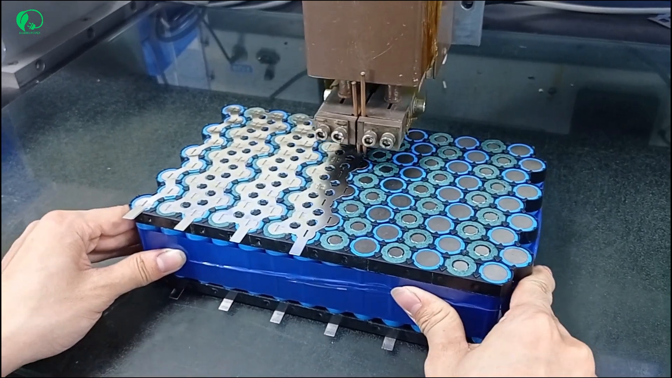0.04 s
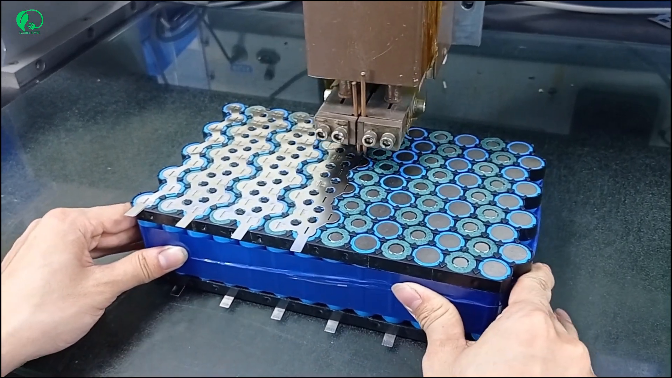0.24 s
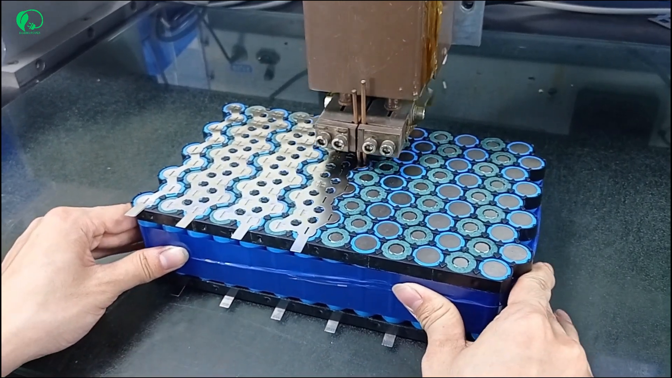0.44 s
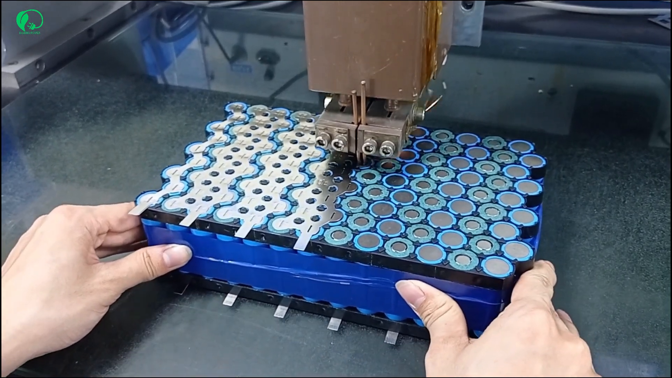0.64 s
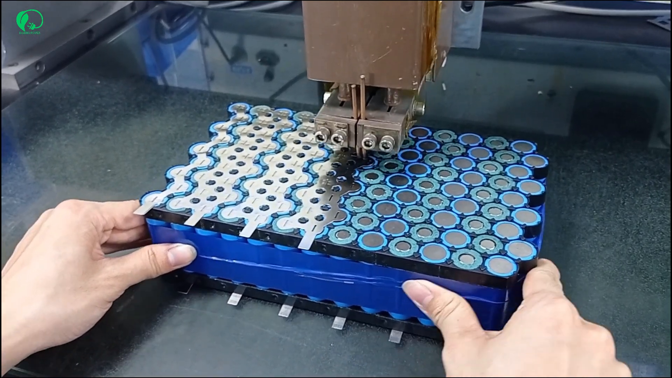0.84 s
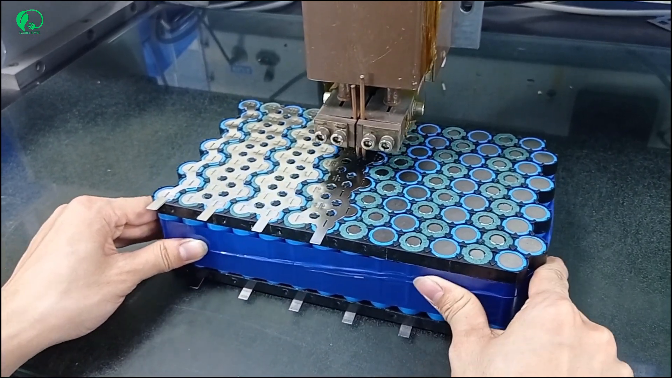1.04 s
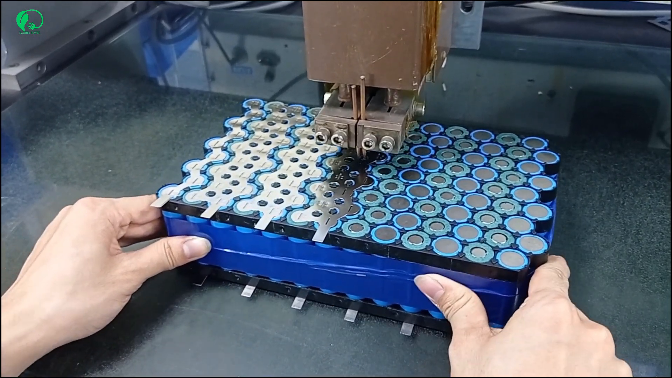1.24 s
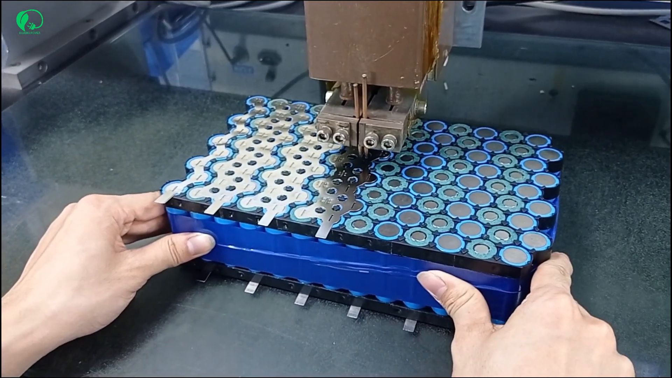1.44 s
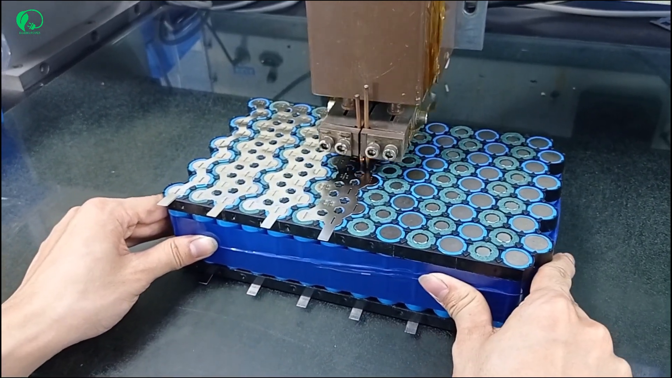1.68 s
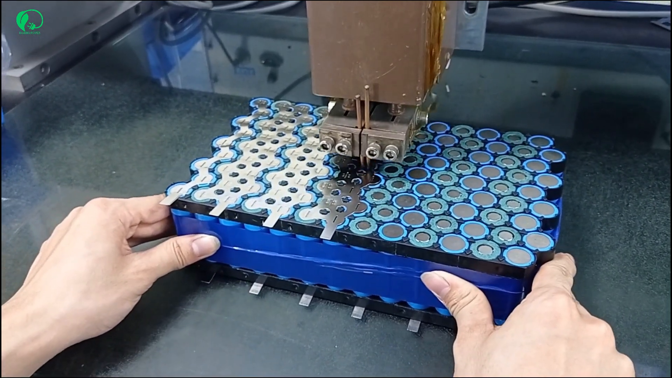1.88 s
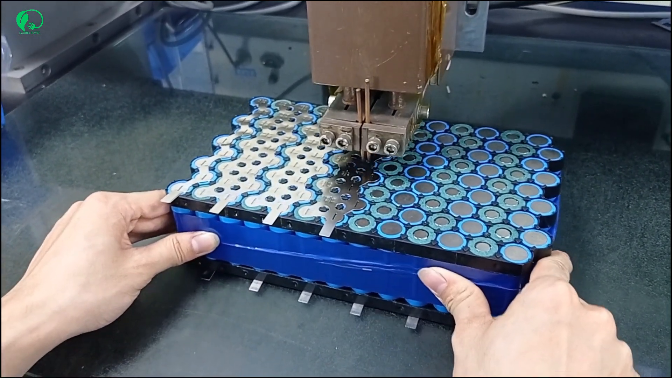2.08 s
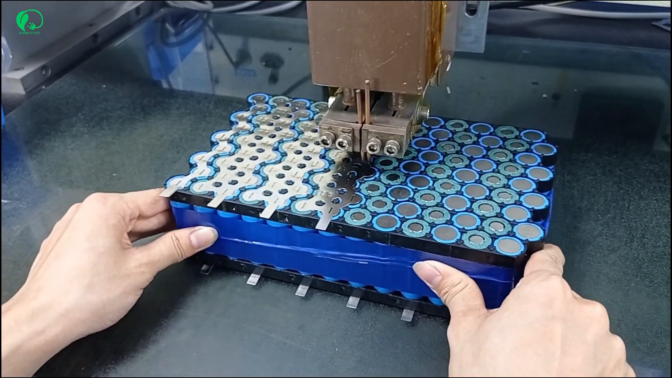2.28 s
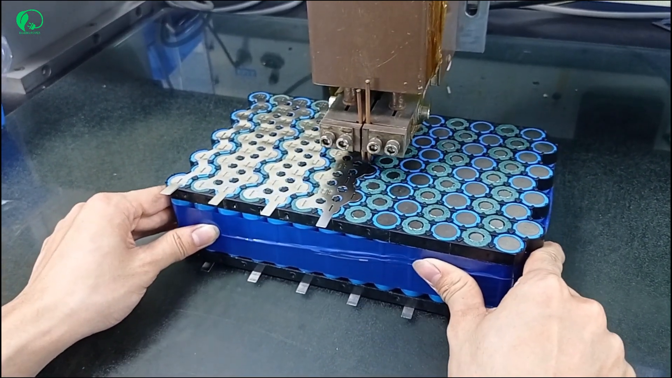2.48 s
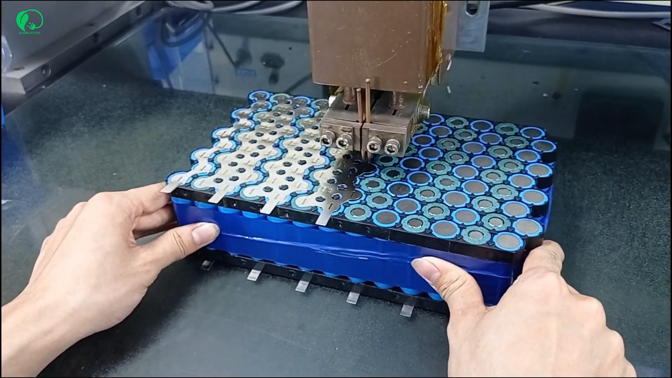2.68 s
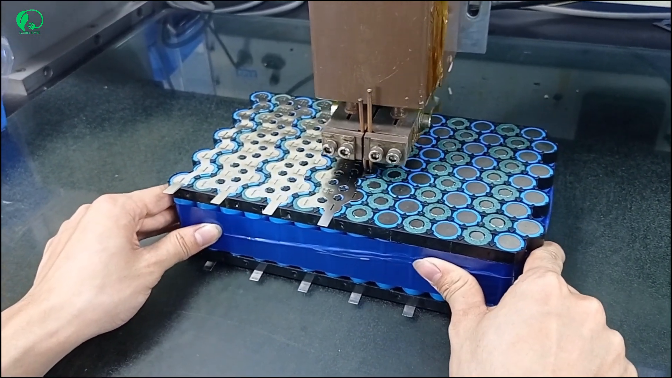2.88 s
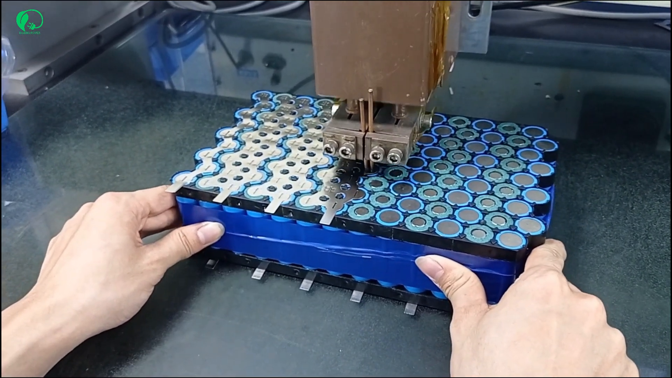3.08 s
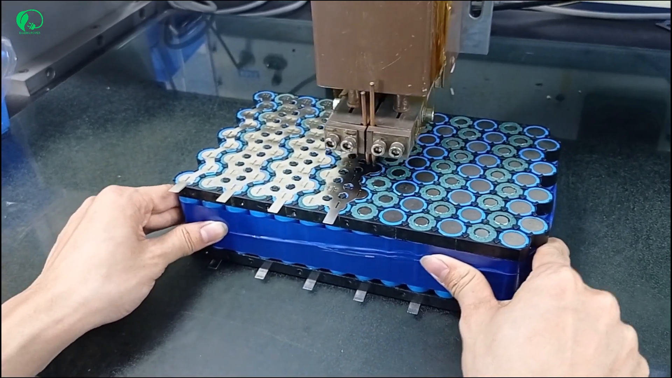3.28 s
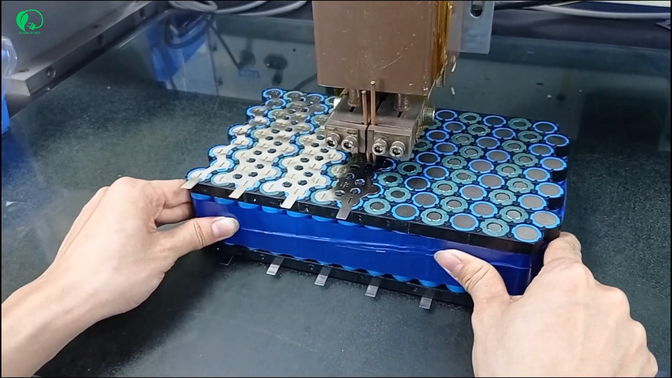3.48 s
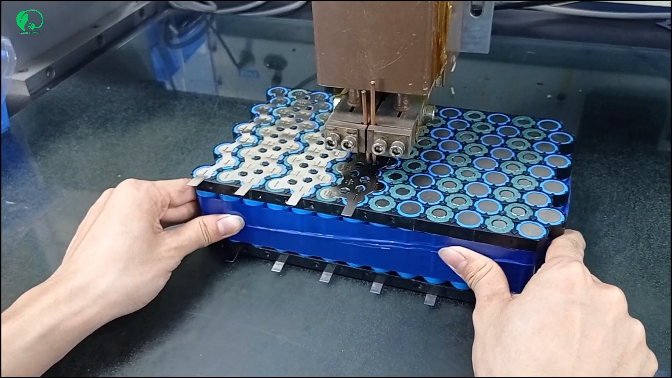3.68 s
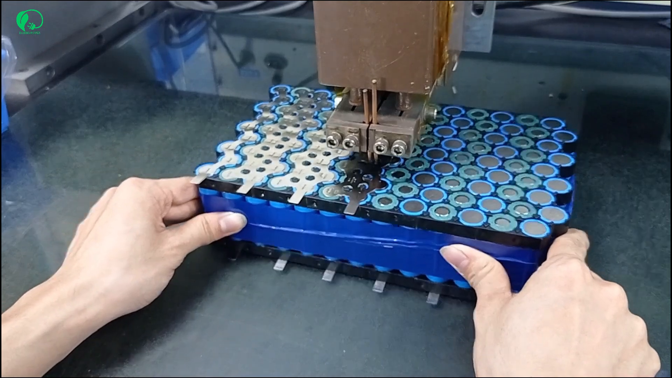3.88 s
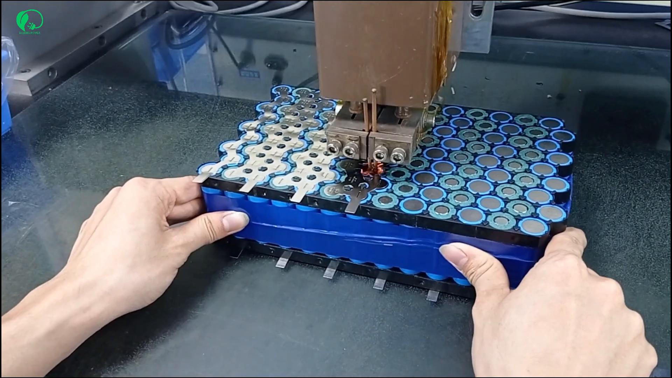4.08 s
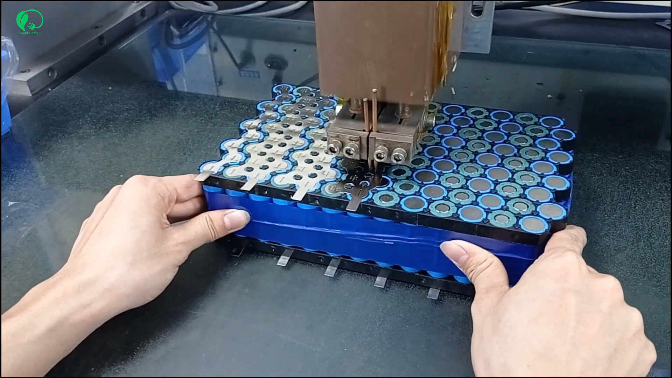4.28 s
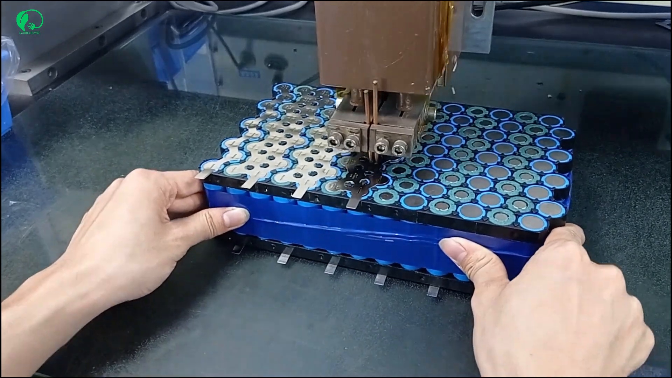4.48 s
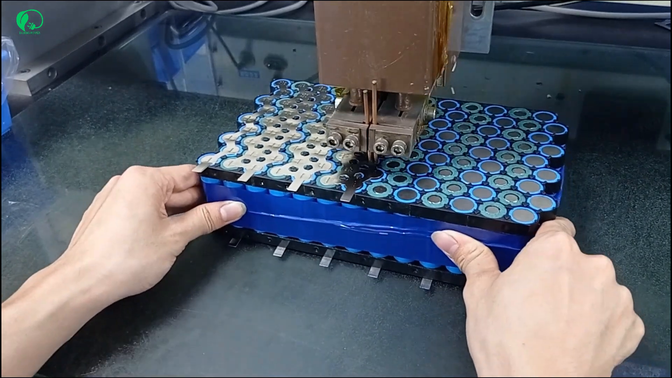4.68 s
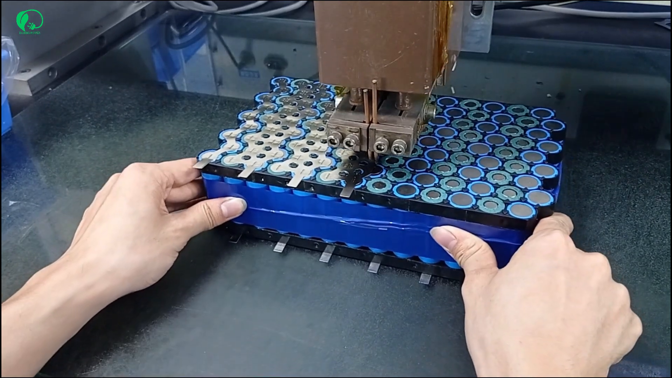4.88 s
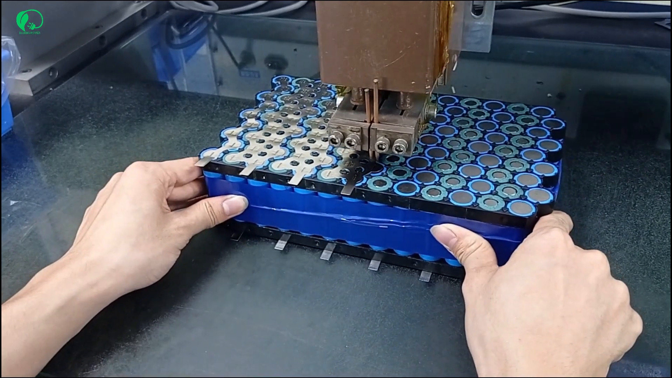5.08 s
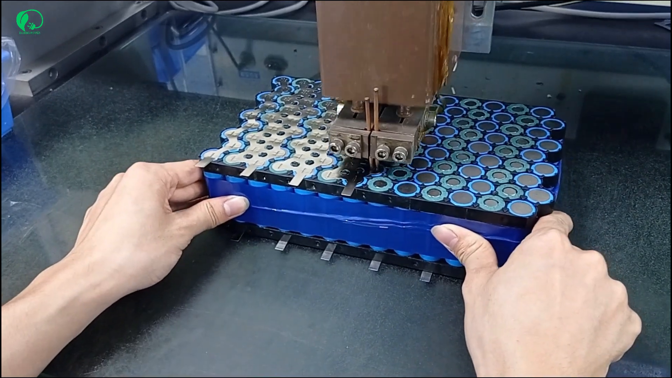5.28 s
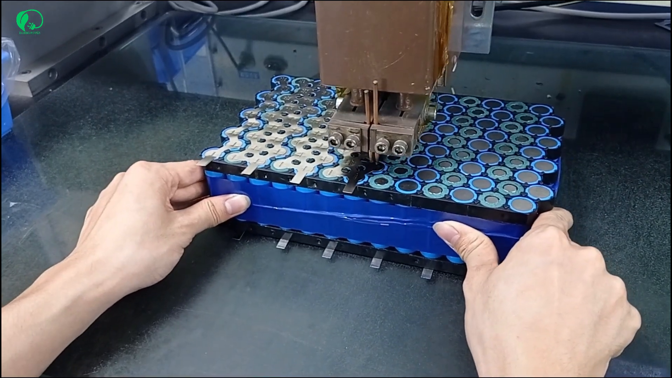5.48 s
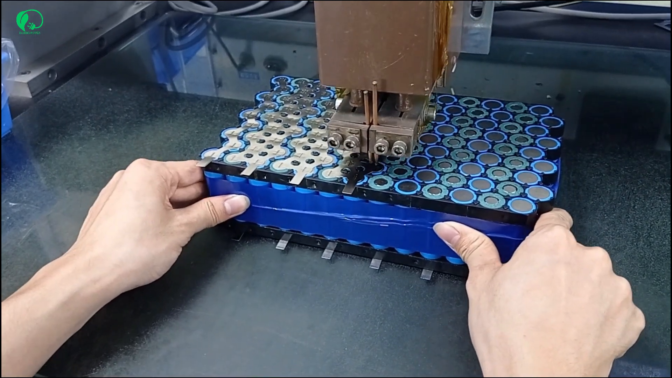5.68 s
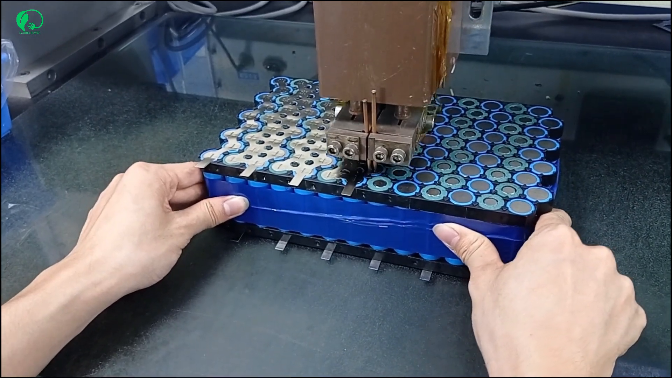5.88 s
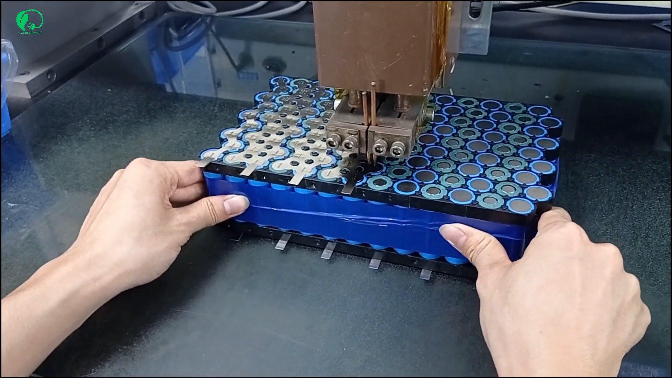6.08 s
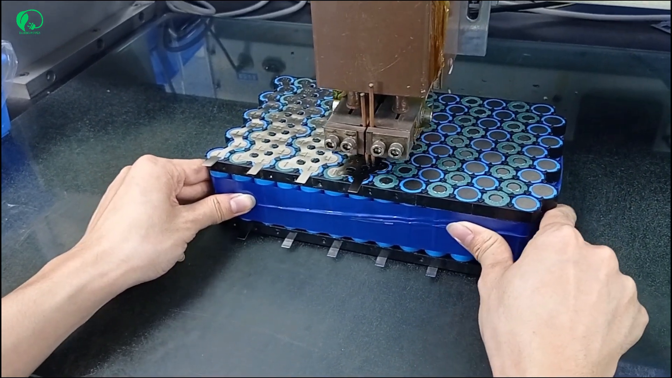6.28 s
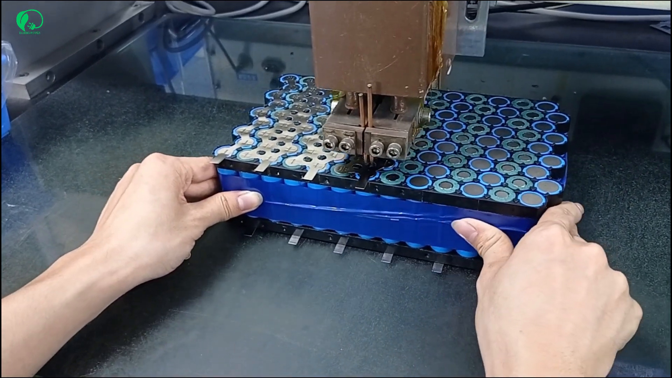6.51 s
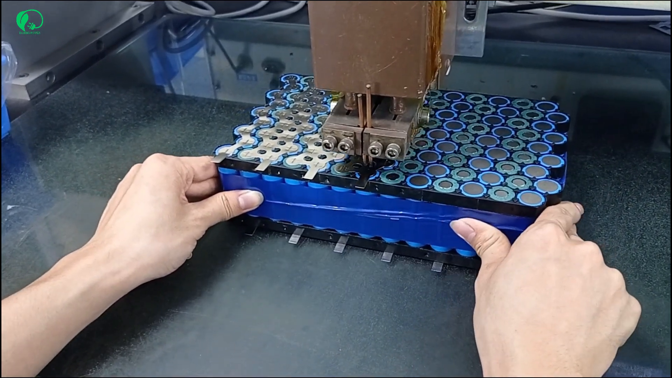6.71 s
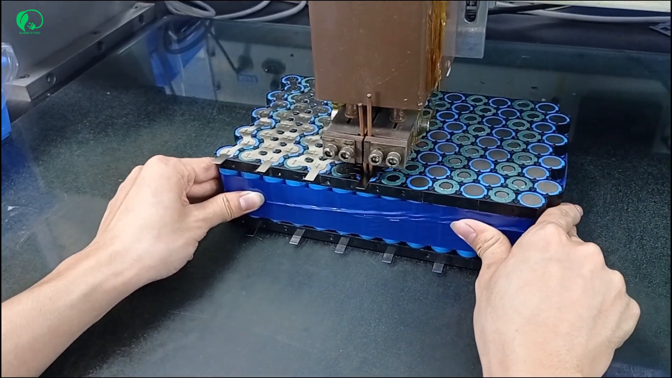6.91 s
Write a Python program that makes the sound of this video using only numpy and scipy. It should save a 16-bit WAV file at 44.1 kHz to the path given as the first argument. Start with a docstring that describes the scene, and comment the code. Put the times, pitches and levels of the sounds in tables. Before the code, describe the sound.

A steady, mid-toned drone and whirr of factory machines runs throughout, with a faint hall echo. Close to the microphone, a pneumatic spot welder works on a battery pack. Each stroke starts with a puff of air, then a metallic clack and jangle with low thumps, a tiny squeak, and about 0.15 seconds after landing a sharp, bright weld snap, followed by a rattling rebound. Pairs snap at about 0.5 and 0.8, 1.8 and 2.0, 3.0 and 3.3, then 4.2 and 4.5 seconds. Singles follow at 5.4, 6.1 and 7.1. Strokes after a longer rest open with a clicking spit of air. Small vents hiss around 1.5, 2.4, 2.8 and 6.55. Very thin, high metal squeals flutter near 2.2, 4.7 and 5.5 as the pack shifts. Faint distant knocks come around 2.4 and 3.8.

```python
"""Machines hum in a factory hall while a nearby pneumatic welder makes four pairs of spot welds, then three singles.
In each stroke the valve puffs, the head lands, squeaks and presses, the weld snaps and the head rebounds.
Air vents between some strokes; thin squeals, as the battery pack is shifted, follow the second and fourth
pairs and the first single. Filtered noise makes the air and contacts, sines the resonances and squeals."""
import sys
import numpy as np
from scipy import signal
from scipy.fft import rfft, irfft, next_fast_len
from scipy.io import wavfile
from scipy.ndimage import map_coordinates

SR = 44100
rng = np.random.default_rng(int(sys.argv[2]) if len(sys.argv) > 2 else 0)


def wrap_up_sound(samples):
    """Save the sound to the file named by the first command line argument, as 16-bit audio."""
    columns = np.atleast_2d(samples).T
    # keep every value between -1 and 1, then stretch to whole-number steps
    tamed = np.clip(columns, -1, 1)
    steps = np.round(tamed * 32767).astype(np.int16)
    wavfile.write(sys.argv[1], SR, steps)


N = 306406  # length in samples

# All levels in the tables are relative; each source adds its own gain.
# Noise spectra of the hall's machines, escaping air and the frame: [f/Hz, level/dB per Hz]
HALL_SPECTRUM = [(30, -10), (97, -2), (161, -1), (373, -6), (600, -9), (1000, -14), (1500, -16.5),
                 (1950, -15.5), (2410, -8.5), (3000, -16.5), (3820, -26.5), (6900, -31.5), (10000, -46.5),
                 (14000, -85)]
AIR_SPECTRUM = [(300, 12.5), (1500, -5), (2100, 15.5), (2800, 6.5), (3700, -2), (5500, 2), (7400, 6.5),
                (9000, -3), (10500, -5.5), (13000, -21), (15200, -2.5), (17000, -42)]
FRAME_SPECTRUM = [(45, -45), (70, -43), (95, 4.5), (150, 4), (220, -2), (300, -13.5), (600, -58)]
# Noise spectra of the head's contact, loose steel and the weld: [f/Hz, level/dB per Hz]
CLACK_SPECTRUM = [(60, -39), (100, -0.5), (230, 1.5), (300, -5), (600, -4.5), (950, -3.5), (1350, -11.5),
                  (1900, -20), (3000, -31), (8000, -52)]
JANGLE_SPECTRUM = [(700, -21), (1500, -9), (1950, -7), (2350, 2.5), (2950, -3), (3700, -17), (5200, -20.5),
                   (7000, -18), (10000, -32.5), (13000, -44), (15300, -28), (17000, -54)]
CRACK_SPECTRUM = [(120, -30), (200, -5), (370, -11.5), (870, -1), (1400, -4), (1700, -3), (1950, -14),
                  (2250, -2), (2900, -2.5), (3700, -13), (5400, -12), (7600, -3.5), (12800, -28),
                  (15000, -12), (17000, -39)]
# Knocks further off in the hall: [t/s, level/dB]
FAR_KNOCKS = [(2.403, -42), (2.495, -31), (3.817, -36.5)]
# Reverberation time of the hall: [f/Hz, t60/s]
ROOM_DECAY = [(100, 2.12), (1000, 1.33), (3000, 0.9), (7000, 0.99), (11000, 0.64), (15000, 0.55)]
# Metal squeals as the pack shifts, one curve each: [t/s, f/Hz, level/dB]
SQUEAL_CURVES = [
    [(2.17, 11400, -67), (2.198, 11500, -47), (2.25, 11300, -46), (2.3, 11300, -58), (2.31, 11300, -53)],
    [(4.61, 11500, -63), (4.62, 11200, -56), (4.654, 11900, -52), (4.68, 11760, -52), (4.692, 11600, -48),
     (4.802, 11560, -50), (4.83, 11800, -58)],
    [(5.48, 12200, -60), (5.504, 12400, -53), (5.532, 12300, -52), (5.56, 11900, -72)],
]
# Small vents of air between strokes: [t/s, level/dB, hold/s, t60/s]
AIR_VENTS = [(1.4664, -37, 0.003, 0.04), (2.381, -26.5, 0.017, 0.42), (2.7554, -42, 0.003, 0.05),
             (6.554, -30, 0.015, 0.43)]
# Partials of the squeaking slide: [f/Hz, level/dB]
SLIDE_PARTIALS = [(4150, -7.5), (7250, -7), (7800, -5.5), (12200, -25)]
# Modes of the electrode holder: [f/Hz, width/Hz, level/dB]
HOLDER_MODES = [(849, 25, -8), (1656, 54, 0), (2244, 52, 1), (2655, 71, 3), (2900, 28, -2), (3526, 23, -5),
                (3974, 27, -7.5), (4837, 120, -4.5), (4870, 28, -22), (5100, 63, -17), (6000, 40, -46),
                (6640, 97, 2.5), (6940, 120, -12), (7340, 54, -33), (7870, 56, -3), (8570, 49, -11)]
# Strokes: [landing t/s, snap t/s, valve level/dB, head level/dB, snap level/dB]
WELD_STROKES = [(0.399, 0.542, -2, 0.5, -9), (0.645, 0.7944, -3.5, -2, -10.5),
                (1.638, 1.7851, -0.5, 2, -9.5), (1.896, 2.0419, -3.5, -3, -8.5),
                (2.893, 3.0434, -0.5, 0.5, -7), (3.12, 3.268, -8, -5.5, -9.5),
                (4.066, 4.224, -0.5, 0.5, -9), (4.347, 4.4898, -3, -1, -6.5), (5.3, 5.444, 1, 1, -8),
                (5.921, 6.0617, -1.5, 0, -8.5), (6.966, 7.11, 2.5, 0, -8.5)]
# Blows as the head lands and presses home: [t after landing/s, clack level/dB, steel jangle level/dB,
# frame thump level/dB, thump f/Hz, bench boom level/dB]
PRESS_BLOWS = [(0, -20, -24, -33, 150, -31), (0.0625, -23.5, -21.5, -26, 172, -32),
               (0.098, -25.5, -27, -33, 200, -46)]
# Blows as the head rebounds and settles: [t after snap/s], then the same columns
REBOUND_BLOWS = [(0.034, -22.5, -24.5, -25.5, 185, -41), (0.066, -31, -34, -28.5, 215.6, -34)]

REST_S = 0.3  # the valve's click is heard only after a longer rest
CLICK_LEAD_S, PUFF_LEAD_S, HISS_LEAD_S = 0.077, 0.065, 0.055  # valve opens, piston jolts, air escapes: before landing
CLICK_DB, HISS_DB, JOLT_DB = -23, -31, -26  # relative levels
CLICK_T60_S = 0.26
SQUEAK_AFTER_S, SQUEAK_S, SQUEAK_DB = 0.044, 0.033, -30  # delay after landing, duration, gain
BLOW_SCATTER_DB, PITCH_SCATTER = 1.5, 0.071  # standard deviations from blow to blow; pitch in log units
TOP_HZ = 16100  # upper band limit


def amp(db):
    """Decibel law: twenty decibels are a tenfold amplitude."""
    return 10 ** (np.asarray(db) / 20)


def unit(x):
    """Normalisation: scale a signal to rms 1."""
    return x / np.sqrt(np.mean(x ** 2) + 1e-20)


def along(points, hz):
    """Logarithmic frequency axis: interpolate [f/Hz, value] points."""
    f, value = np.transpose(points)
    return np.interp(np.log(hz + 1), np.log(f + 1), value)


def filtered(x, response):
    """Linear filtering: multiply the spectrum by a response of frequency."""
    size = next_fast_len(len(x) + 8192)  # zero padding
    spectrum = rfft(x, size) * response(np.fft.rfftfreq(size, 1 / SR))
    return irfft(spectrum, size)[:len(x)]


def noise(spectrum, size):
    """Spectral shaping: white noise coloured by a table, at rms 1."""
    return unit(filtered(rng.standard_normal(size), lambda hz: amp(along(spectrum, hz))))


def band(centre_hz, width_hz, size):
    """Resonance: noise passed through one bell-shaped peak, at rms 1."""
    def peak(hz):
        return 1 / (1 + (2 * (hz - centre_hz) / width_hz) ** 2)
    return unit(filtered(rng.standard_normal(size), peak))


def wobble(rate, size):
    """Slow random modulation: a smooth curve through rate random knots a second."""
    knots = rng.standard_normal(int(size * rate / SR) + 4)
    return map_coordinates(knots, [np.arange(size) * rate / SR])


def tone(hz):
    """Phase is the integral of frequency: a sine on a pitch curve, from a random phase."""
    return np.sin(2 * np.pi * (np.cumsum(hz) / SR + rng.random()))


def burst(t, rise, hold, t60):
    """Excitation and damping: an envelope that rises, holds and falls exponentially (times in s)."""
    return (1 - np.exp(-t / rise)) * amp(-60 * np.maximum(t - hold, 0) / t60)


def add(track, s, sound):
    """Superposition: add a sound to the track at t = s seconds."""
    part = track[max(round(s * SR), 0):][:len(sound)]
    part += sound[:len(part)]


def hall():
    """Broadband and resonant noise: machines drone and whirr, with damped knocks further off."""
    drone = noise(HALL_SPECTRUM, N) * amp(0.16 * wobble(7, N))
    whirr = band(centre_hz=2390, width_hz=670, size=N)
    out = amp(-43.0) * drone + amp(-51) * whirr
    t = np.arange(SR // 2) / SR
    for s, db in FAR_KNOCKS:
        knock = band(centre_hz=694, width_hz=1100, size=len(t)) * burst(t, rise=0.0019, hold=0.012, t60=0.71)
        add(out, s, amp(db - 6.5) * knock)
    return out


def echo(x):
    """Reverberation: convolution with a noise tail in which each frequency dies at its own rate."""
    hz, t, cells = signal.stft(rng.standard_normal(SR), SR, nperseg=256)
    decay = amp(-60 * t / along(ROOM_DECAY, hz)[:, None])
    tail = signal.istft(cells * decay, SR, nperseg=256)[1]
    tail = np.pad(tail / np.linalg.norm(tail), (round(.02 * SR), 0))  # 20 ms pre-delay
    return signal.fftconvolve(x, tail)[:N]


def squeals():
    """Friction of metal on metal: a thin, fluttering whistle, its pitch jitter blurring it into narrow hiss."""
    out = np.zeros(N)
    for rows in SQUEAL_CURVES:
        s, hz, db = np.transpose(rows)
        t = np.arange(s[0], s[-1], 1 / SR)
        pitch = np.interp(t, s, hz) + 90 * wobble(39.9, len(t))
        whistle = tone(pitch + 130 * wobble(600, len(t)))
        hiss = .7 * tone(pitch) * wobble(900, len(t))
        level = amp(np.interp(t, s, db) + 2.5 + 3.2 * wobble(154.0, len(t)))
        add(out, s[0], level * (whistle + hiss) * signal.windows.tukey(len(t), .15))
    return out


def spit(t, db, hold, t60):
    """Turbulence of escaping air: a short burst of fluttering noise."""
    air = noise(AIR_SPECTRUM, len(t)) * amp(2.0 * wobble(196, len(t)))
    return amp(db - 13.5) * air * burst(t, rise=0.0037, hold=hold, t60=t60)


def thump(t, pitch_hz, hold, t60):
    """Frame resonance: a sine wandering about one pitch, blurred by noise for the neighbouring modes."""
    pitch = pitch_hz * np.exp(0.082 * wobble(37.9, len(t)))
    push = np.sin(2 * np.pi * np.cumsum(pitch) / SR)
    return (push + 0.57 * noise(FRAME_SPECTRUM, len(t))) * burst(t, rise=0.0025, hold=hold, t60=t60)


def valve():
    """Release of compressed air: a click after a rest, a jolt of the piston, then turbulent hiss; also the vents."""
    out, t = np.zeros(N), np.arange(SR // 2) / SR
    last_snap_s = -np.inf
    for land_s, snap_s, valve_db, _, _ in WELD_STROKES:
        if land_s - last_snap_s > REST_S:
            add(out, land_s - CLICK_LEAD_S, spit(t, CLICK_DB, hold=0.026, t60=CLICK_T60_S))
        flutter = amp(1.9 * wobble(302, len(t)) + 2.0 * wobble(48, len(t)))
        hiss = noise(AIR_SPECTRUM, len(t)) * flutter * burst(t, rise=0.0018, hold=0.0054, t60=0.46)
        add(out, land_s - HISS_LEAD_S, amp(valve_db + HISS_DB) * hiss)
        jolt = thump(t, pitch_hz=185, hold=0.0092, t60=0.024)
        add(out, land_s - PUFF_LEAD_S, amp(valve_db + JOLT_DB) * jolt)
        last_snap_s = snap_s
    for s, db, hold, t60 in AIR_VENTS:
        add(out, s, spit(t, db, hold, t60))
    return out


def slide():
    """Sliding friction: a squeak of a few rough partials, and one falling chirp just before each snap."""
    out = np.zeros(N)
    for land_s, snap_s, _, _, snap_db in WELD_STROKES:
        size = round(SQUEAK_S * SR)
        squeak = np.zeros(size)
        for hz, level in SLIDE_PARTIALS:
            partial = tone(hz + 90 * wobble(460, size))
            squeak += amp(level) * partial * amp(2.4 * wobble(210, size))
        scrape = amp(-8) * noise(AIR_SPECTRUM, size)
        rub = (squeak + scrape) * signal.windows.tukey(size, .7)
        add(out, land_s + SQUEAK_AFTER_S, amp(SQUEAK_DB) * rub)
        size = round(0.016 * SR)
        chirp = tone(np.linspace(8000, 7550, size) + 70 * wobble(530, size))
        add(out, snap_s - .018, amp(snap_db - 22) * chirp * signal.windows.hann(size))
    return out


def ring(t, hold, t60, tilt_db):
    """Modal vibration: the holder's modes at random strengths, higher ones dying sooner; tilt is dB per octave."""
    hz, width, level = np.transpose(HOLDER_MODES)[:, :, None]
    gain, detune = rng.standard_normal((2, len(HOLDER_MODES), 1))
    pitch = hz + 0.13 * width * detune * np.sqrt(hz / 1000)
    waves = np.sin(2 * np.pi * (pitch * t + rng.random(hz.shape)))
    strength = amp(level + 2.5 * gain + tilt_db * np.log2(hz / 2000))
    envelope = burst(t, rise=0.0039, hold=hold, t60=t60 / np.sqrt(hz / 1000))
    return np.sum(strength * waves * envelope, axis=0)


def chatter(t, spread_s, t60, later_db, count):
    """Repeated impact: the envelope of a sharp first contact and some mostly weaker ones soon after."""
    starts = np.append(0, spread_s * (np.arange(count) + rng.random(count)) / count)[:, None]
    sizes = np.append(0, later_db + 2 * rng.standard_normal(count))[:, None]
    contacts = amp(sizes) * burst(np.maximum(t - starts, 0), rise=0.00063, hold=0, t60=t60)
    return np.linalg.norm(contacts, axis=0)  # powers add


def blow(clack_db, jangle_db, thump_db, pitch_hz, boom_db):
    """Impact: the head's contact excites loose steel, the holder, the frame and the bench."""
    t = np.arange(SR // 5) / SR
    contacts = chatter(t, spread_s=0.0198, t60=0.036, later_db=-4.5, count=3)
    shake = np.hypot(contacts, amp(-7) * burst(t, rise=0.0029, hold=0.014, t60=0.18))
    clack = amp(clack_db - 3) * noise(CLACK_SPECTRUM, len(t)) * shake
    steel = noise(JANGLE_SPECTRUM, len(t)) * amp(0.78 * wobble(716, len(t)))
    jangle = amp(jangle_db - 2.0) * steel * shake
    holder = amp(jangle_db - 13.5) * ring(t, hold=0.0053, t60=0.073, tilt_db=-3.0)
    frame_hz = pitch_hz * np.exp(PITCH_SCATTER * rng.normal())
    frame = amp(thump_db + 1) * thump(t, frame_hz, hold=0.0081, t60=0.19)
    # the bench boom swells more slowly
    bench = tone(np.full(len(t), 92) * np.exp(0.047 * rng.normal()))
    boom = amp(boom_db) * bench * burst(t, rise=0.014, hold=0.038, t60=0.19)
    return amp(BLOW_SCATTER_DB * rng.normal()) * (clack + jangle + holder + frame + boom)


def knocks():
    """Impact sequence: each stroke deals three blows on the way down and two on the rebound."""
    out = np.zeros(N)
    for land_s, snap_s, _, head_db, _ in WELD_STROKES:
        for after_s, *colour in PRESS_BLOWS:
            add(out, land_s + after_s, amp(head_db) * blow(*colour))
        for after_s, *colour in REBOUND_BLOWS:
            add(out, snap_s + after_s, blow(*colour))
    return out


def snaps():
    """Impulsive excitation: each weld gives a bright crack, a duller chatter and the ring of the holder."""
    out, t = np.zeros(N), np.arange(SR // 4) / SR
    for _, s, _, _, db in WELD_STROKES:
        sharp = burst(t, rise=0.00017, hold=0.0024, t60=0.027)
        body = amp(-9) * burst(t, rise=0.0052, hold=0.015, t60=0.052)
        add(out, s, amp(db - 11.5) * noise(CRACK_SPECTRUM, len(t)) * (sharp + body))
        rattle = noise(JANGLE_SPECTRUM, len(t)) * burst(t, rise=0.0042, hold=0.01, t60=0.033)
        add(out, s, amp(db - 15.0) * rattle)
        add(out, s, amp(db - 15.5) * ring(t, hold=0.0036, t60=0.15, tilt_db=-2.5))
    return out


def scene():
    """Superposition of hall, welder and reverberation, alike in both channels."""
    motion = knocks() + valve() + slide() + squeals()
    welds = snaps()
    # the clatter and echo dip briefly, by 3 dB, just before each snap
    lull = np.zeros(N)
    for _, snap_s, *_ in WELD_STROKES:
        add(lull, snap_s - .016, signal.windows.hann(round(0.014 * SR)))
    clatter = (motion + amp(-14.0) * echo(motion + welds)) * amp(-3 * lull)
    mono = welds + clatter + hall()
    return np.array([mono, mono])


def record(dry):
    """Band limitation and saturation: the microphone sheds deep bass, rounds tall peaks and cuts the top."""
    bass_cut = signal.butter(2, 68, "highpass", fs=SR, output="sos")
    x = signal.sosfilt(bass_cut, dry)
    x = x / (1 + np.abs(x / .42) ** 6) ** (1 / 6)  # peaks level off at 0.42
    top_cut = signal.ellip(10, .1, 80, TOP_HZ, fs=SR, output="sos")
    return signal.sosfilt(top_cut, x)


dry = scene()
out = record(dry)
wrap_up_sound(out)
```